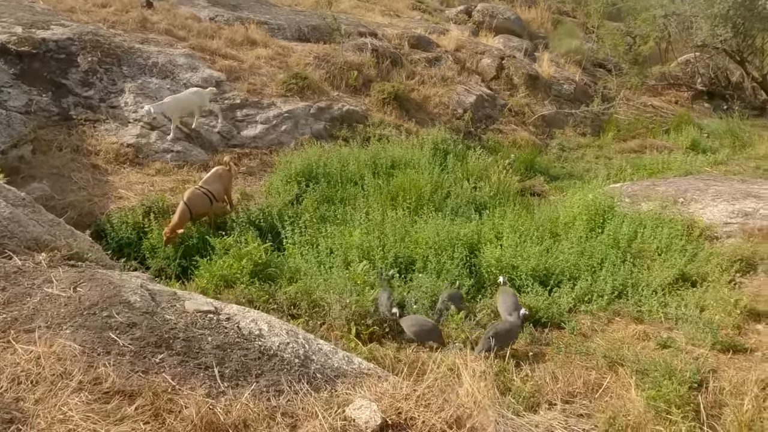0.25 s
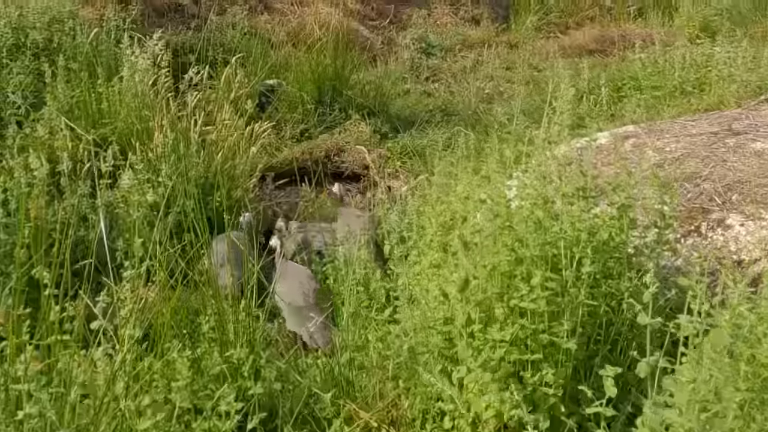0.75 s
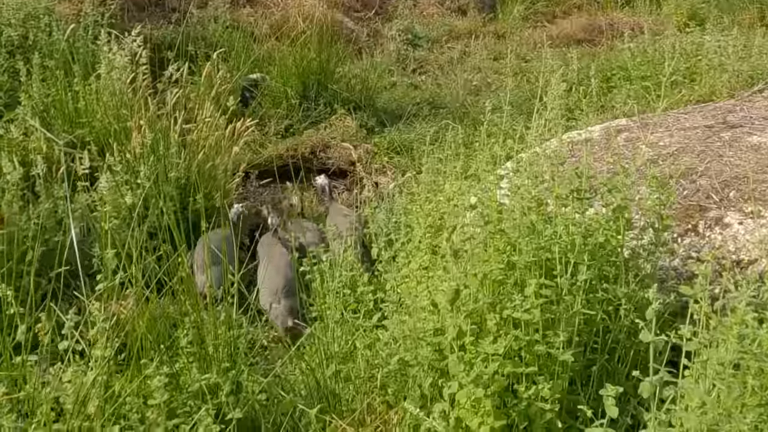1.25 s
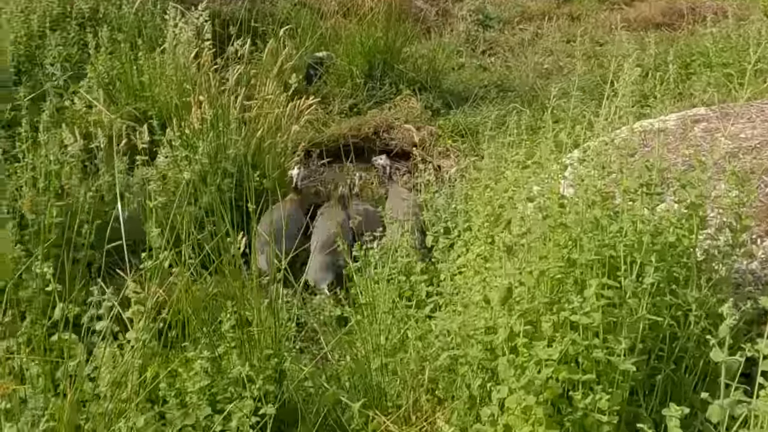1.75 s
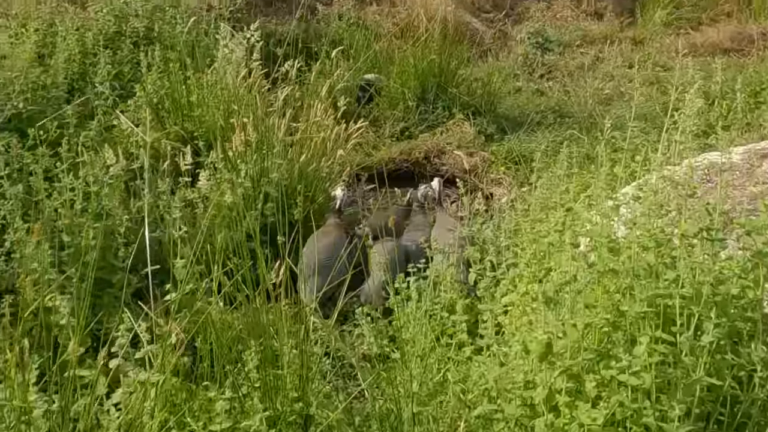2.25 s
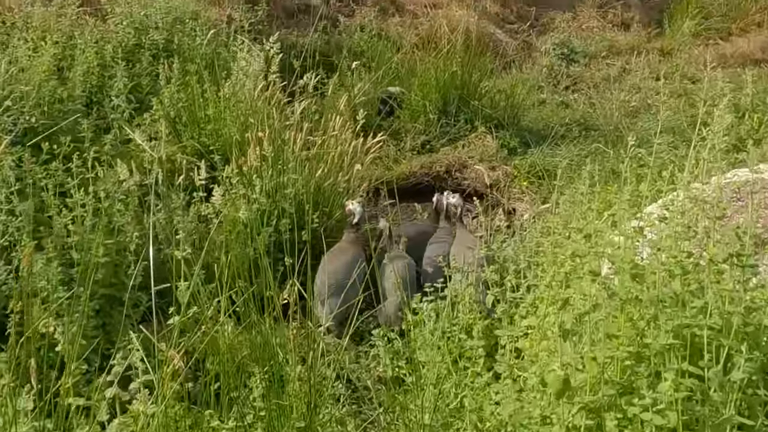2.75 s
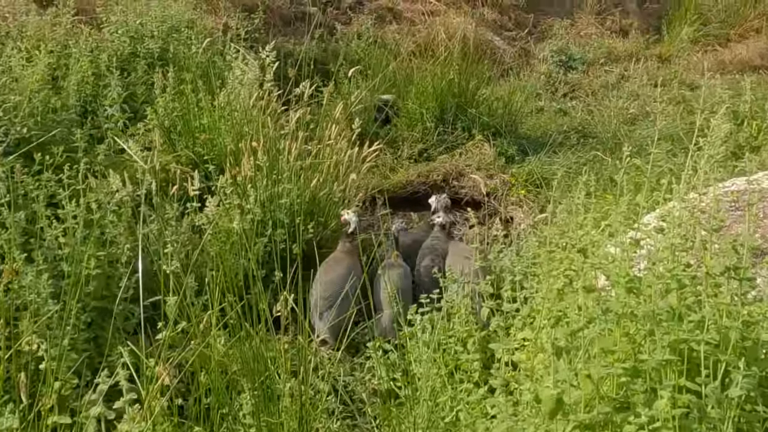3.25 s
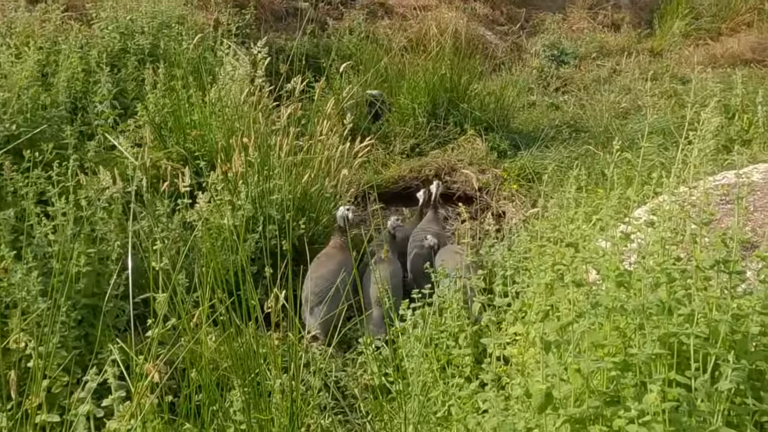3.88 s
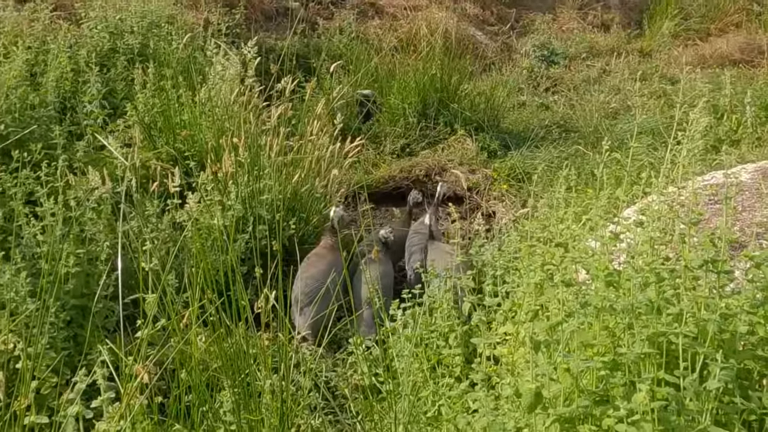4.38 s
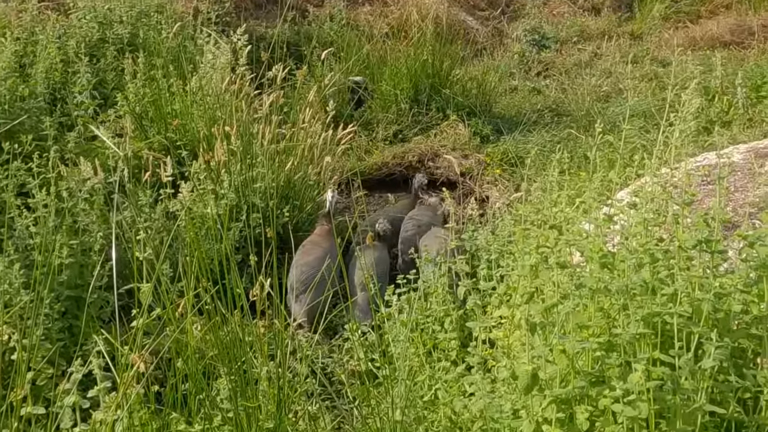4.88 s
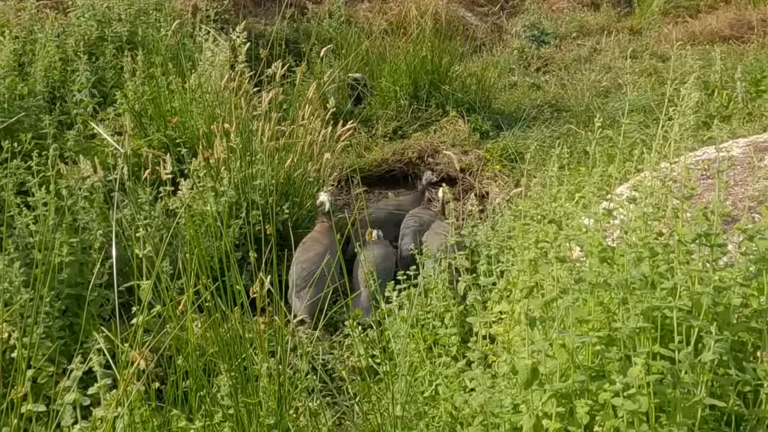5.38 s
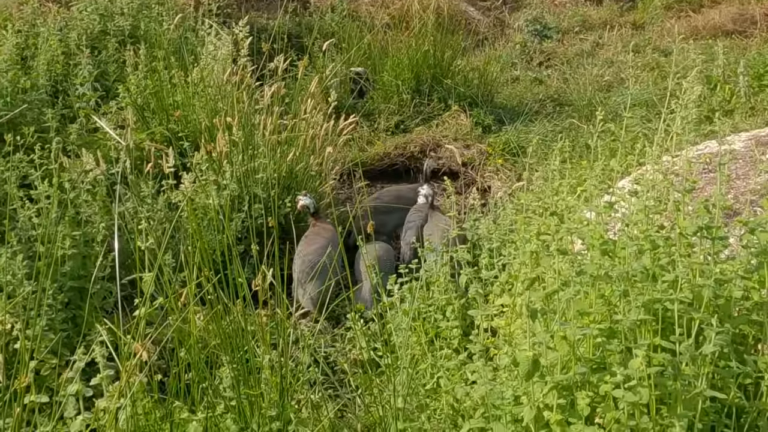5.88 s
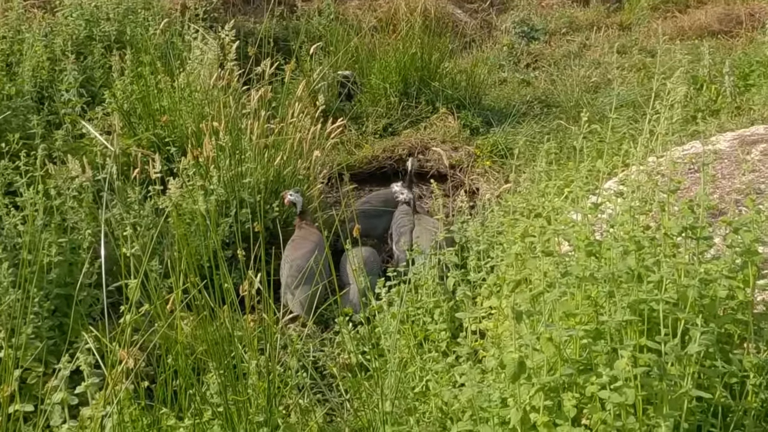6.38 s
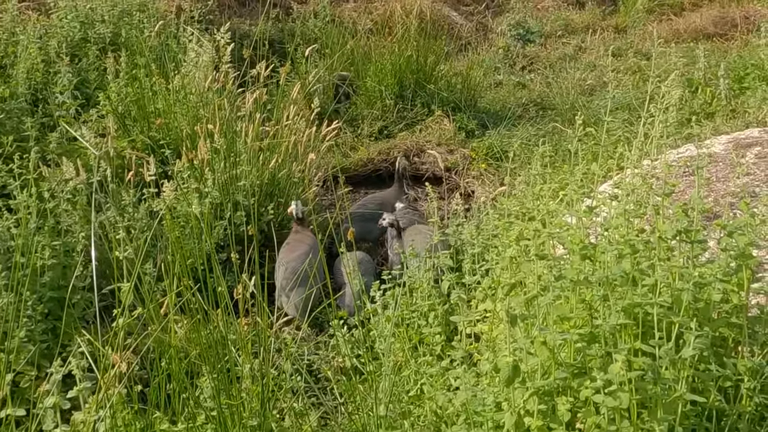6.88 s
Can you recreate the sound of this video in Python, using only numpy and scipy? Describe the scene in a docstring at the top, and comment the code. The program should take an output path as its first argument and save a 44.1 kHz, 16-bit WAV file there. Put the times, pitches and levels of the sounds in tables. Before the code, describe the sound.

Small guinea fowl calls, sparse and separate, over a soft open-air hush. The opening is busiest, with hissing grass and bright cracking stems; by two seconds the rustle has faded. Wavering whistles lead to a tall whistle and a loud harsh squawk near three and a half seconds, then more brief chirps to the end. Occasional dull thumps and tiny snaps, with a slight echo from rocks, heard by a thin-sounding outdoor microphone.

```python
"""A rocky hillside with tall weeds: a few guinea fowl call while dry grass rustles, loudest at the start.
The birds give thin arching whistles, almost sines, and low reedy cries, which are stacks of overtones, with
a few short whistle-high tones. Rasps, uneven pulses ringing the throat, often break in between them.
Stems crackle in short bursts of noise, a few soft low thumps sound, and the rocks give a faint echo.
Under it lies the hush of the open air, made of filtered noise."""
import sys
import numpy as np
from scipy import signal
from scipy.fft import rfft, irfft, next_fast_len
from scipy.io import wavfile
from scipy.ndimage import uniform_filter1d

SR = 44100
rng = np.random.default_rng(int(sys.argv[2]) if len(sys.argv) > 2 else 0)


def master_out(mix):
    """Clip the mix to full scale and print it as 16-bit PCM to the path in sys.argv[1]."""
    frames = np.transpose(np.atleast_2d(mix))
    ceiling = np.clip(frames, -1, 1)
    pcm = np.round(ceiling * 32767).astype(np.int16)
    wavfile.write(sys.argv[1], SR, pcm)


N = 314433  # length in samples


def amp(db):
    """Turns decibels into a plain factor."""
    return 10 ** (np.asarray(db) / 20)


def unit(x):
    """Scales a sound to an average (rms) strength of one."""
    return x / np.sqrt(np.mean(abs(x) ** 2) + 1e-20)


def read(points, hz):
    """Reads the gain of a spectrum at some frequencies, with straight lines over log frequency."""
    f, db = np.transpose(points)
    return amp(np.interp(np.log(hz + 1), np.log(f), db))


def colour(x, points):
    """Filters a sound by a spectrum."""
    size = next_fast_len(len(x) + 2048)
    gain = read(points, np.fft.rfftfreq(size, 1 / SR))
    return irfft(rfft(x, size) * gain, size)[:len(x)]


def band_rms(x, lo, hi):
    """Strength of one frequency band of a sound."""
    hz = np.fft.rfftfreq(len(x), 1 / SR)
    inside = (hz > lo) & (hz < hi)
    return np.sqrt(2 * np.sum(abs(rfft(x)[inside]) ** 2)) / len(x)


def wander(size, rate):
    """A random line that heads for a new value rate times a second."""
    at = np.arange(size) * rate / SR
    return unit(np.interp(at, np.arange(size), rng.standard_normal(size)))


def resonate(x, hz, width):
    """Rings one resonance, with a gain of one at its centre."""
    return signal.lfilter(*signal.iirpeak(hz, hz / width, SR), x)


def add(mix, s, sound):
    """Lays a sound into the mix at a time in seconds, cutting whatever falls outside."""
    start = round(s * SR)
    sound = sound[max(-start, 0):]
    part = mix[max(start, 0):][:len(sound)]
    part += sound[:len(part)]


def faded(x, fade=0.0017):
    """Softens both ends of a call; fade is in seconds."""
    return x * signal.windows.tukey(len(x), min(2 * fade * SR / len(x), 1))


# colour of the open air's hush: f/Hz, level/dB
AIR_COLOUR = [(140, 2.5), (400, -8.5), (800, 0.5), (1500, 9), (2300, 8.5), (2900, 1.5), (3600, -37.5),
              (6000, -16.5), (12000, -36.5)]
# low gusts, one band each: f/Hz, level/dB against each other
GUST_BANDS = [(160, 2), (300, -1.5), (520, -4)]


def air(level_db=-57.5, low_db=-69, gust_db=3.5):
    """The hush of the open hillside, with small low gusts that come and go in separate bands."""
    hush = amp(level_db) * unit(colour(rng.standard_normal(N), AIR_COLOUR))
    gusts = np.zeros(N)
    for hz, db in GUST_BANDS:
        band = unit(resonate(rng.standard_normal(N), hz, hz / 2))
        gusts += band * amp(db + gust_db * wander(N, 5))
    return hush + amp(low_db) * unit(gusts)


# steady rustle of the grass: t/s, dry hiss level/dB, dull brushing level/dB
STEADY_RUSTLE = [(0, -48, -56.5), (.35, -53, -59), (1.0, -54.5, -53), (1.65, -51, -53), (1.95, -60, -62.5),
                 (2.7, -65.5, -59.5), (4.2, -70, -61.5), (5.1, -73, -64), (5.7, -70, -60),
                 (7.12, -71.5, -63)]
# single sweeps through the grass: t/s, rise/s, fall/s, dry hiss level/dB, dull brushing level/dB
GRASS_SWEEPS = [(.005, .01, 0.038, -45.5, -48), (.56, 0.1, 0.062, -42, -48.5),
                (.705, 0.034, 0.058, -54, -47), (0.909, 0.027, 0.055, -73, -38.5),
                (1.15, 0.048, 0.021, -58, -47.5), (2.25, 0.075, 0.1, -58, -65.5),
                (3.3, .06, .07, -55.5, -51.5), (5.45, 0.21, 0.21, -72, -57.5), (6.17, 0.41, .1, -68, -58.5)]


def stirring(t):
    """Gains of the hiss and the brushing: each sweep swells and fades over the steady rustle."""
    s, *levels = np.transpose(STEADY_RUSTLE)
    power = np.array([amp(np.interp(t, s, db)) ** 2 for db in levels])
    for s, rise, fall, hiss_db, brush_db in GRASS_SWEEPS:
        # a bell curve, with its own width on either side
        swell = np.exp(-np.minimum(((t - s) / np.where(t < s, rise, fall)) ** 2, 20))
        power += (amp([[hiss_db], [brush_db]]) * swell) ** 2
    return np.sqrt(power)


# colour of the dry hiss: f/Hz, level/dB
HISS_COLOUR = [(500, -19.5), (1200, -2), (2400, 13.5), (3500, 8.5), (5000, 4.5), (7000, -2.5), (10000, -28),
               (12500, -10.5), (14000, -35.5), (16000, -29.5)]
# colour of the wash of brushed leaves: f/Hz, level/dB
BRUSH_COLOUR = [(110, -17.5), (220, -1), (380, 4), (650, 3.5), (1000, -3), (2000, -1), (4000, -25),
                (9000, -49.5)]


def grass(crackle_db=-8, crackles_per_s=600, spread_db=4, flicker_db=1.9, treble_db=-14, crisp_until_s=.62,
          crisp_crackle_db=6, clump_db=3, drop_db=-7, fade_db_per_s=4):
    """Blades slide past each other: a hiss with tiny crackles in it, over a dull brushing."""
    t = np.arange(N) / SR
    hiss_gain, brush_gain = stirring(t)
    ticks = (rng.random(N) < crackles_per_s / SR) * rng.choice([-1, 1], N)
    ticks = ticks * amp(spread_db * np.minimum(rng.exponential(1, N), 4))
    ticks *= amp(clump_db * wander(N, 45))  # crackles come in clumps
    blades = rng.standard_normal(N) * amp(flicker_db * wander(N, 70))
    # until crisp_until_s the rustle is crisper, with more crackle and fine treble;
    # then it turns duller at once, and the fine treble goes on sinking
    is_crisp = t < crisp_until_s
    blades += amp(crackle_db + crisp_crackle_db * is_crisp) * unit(ticks)
    crispness = np.where(is_crisp, 1, amp(drop_db - fade_db_per_s * (t - crisp_until_s)))
    fine_treble = colour(blades, [(6000, -39), (9500, 4), (12000, -7.5), (15000, -9)])  # f/Hz, level/dB
    hiss = colour(blades, HISS_COLOUR) + amp(treble_db) * crispness * fine_treble
    brush = colour(rng.standard_normal(N) * amp(flicker_db * wander(N, 40)), BRUSH_COLOUR)
    # the rustle levels set the strength of these two bands
    hiss /= band_rms(hiss, 4500, 8000)
    brush /= band_rms(brush, 200, 650)
    return hiss * hiss_gain + brush * brush_gain


# soft low thumps: t/s, level at the peak of the swell/dB, f/Hz
THUMP_EVENTS = [(2.835, -44.5, 174), (2.962, -48.5, 160), (3.226, -45.5, 188), (3.787, -39, 167),
                (3.92, -53.5, 169), (4.436, -43, 173), (6.125, -40.5, 183)]


def thumps(rise_s=0.0026):
    """A few dull cycles of a low sine that swell and die."""
    mix, t = np.zeros(N), np.arange(3000) / SR
    for s, db, hz in THUMP_EVENTS:
        swell = t / rise_s * np.exp(1 - t / rise_s)
        add(mix, s, amp(db) * swell * np.sin(2 * np.pi * hz * t))
    return mix


# snapping and brushed stems: t/s, level/dB, centre f/Hz, decay/s
STEM_SNAPS = [(0.0398, -22, 3970, 0.00096), (.047, -32, 3460, 0.011), (.109, -29, 3760, .001),
              (.119, -22, 3060, 0.00067), (0.154, -31, 3960, 0.0028), (0.2037, -19.5, 3300, 0.0016),
              (0.212, -29, 3500, 0.0014), (0.2316, -8, 3900, 0.00032), (.241, -7, 3900, .00025),
              (.345, -28.5, 2760, 0.0007), (.53, -26, 3320, 0.0085), (0.561, -32, 3500, 0.00049),
              (.579, -16.5, 3720, 0.0018), (.671, -25.5, 4270, 0.00087), (.855, -38.5, 6450, 0.00053),
              (1.127, -30, 2330, 0.0034), (1.246, -33, 5000, 0.0023), (2.005, -43, 6000, 0.00116),
              (2.624, -38, 2640, 0.0069), (2.634, -36, 2700, 0.0054), (2.666, -45, 2940, 0.0069),
              (2.727, -32, 2680, 0.0043), (2.763, -28.5, 1854, 0.0011), (2.771, -32.5, 2070, 0.0035),
              (2.992, -30, 2060, 0.0026), (3.203, -27.5, 1800, 0.0038), (3.46, -37.5, 2010, .002),
              (5.006, -34.5, 2600, .0007), (6.0175, -33, 2360, 0.0026), (6.063, -32, 2700, 0.0012),
              (6.165, -34, 2980, 0.0034), (6.28, -43.5, 4300, 0.0014)]


def stems(width=0.52, top_ratio=1.49, after_db=-20, after_decay_s=0.076, patter=0.24):
    """Each stem gives a short burst of fracture noise around its own pitch, then its leaves shiver."""
    mix, t = np.zeros(N), np.arange(4000) / SR
    for s, db, hz, decay in STEM_SNAPS:
        # a slowly crushed stem stirs more leaves than a clean snap
        stirred = amp(after_db) * min(decay / 0.0023, 1) ** 2
        shiver = stirred * np.exp(-t / after_decay_s + patter * wander(len(t), 400))
        fall = np.exp(-t / decay) + shiver
        burst = resonate(rng.standard_normal(len(t)) * fall, hz, width * hz)
        band = signal.butter(2, [hz / 4, top_ratio * hz], "bandpass", fs=SR)
        burst = signal.lfilter(*band, burst)
        add(mix, s, amp(db) * unit(burst) * np.sqrt(np.mean(fall ** 2)))
    return mix


# colour of a rasp's grain, shaping it after the throat resonances: f/Hz, level/dB
RASP_GRAIN = [(300, -18), (800, -5), (1500, 5.5), (2800, 5.5), (3700, -8), (5200, -7.5), (7000, -31.5),
              (14000, -47)]


def rasp(s, db, rise, fall, hz, chest_db, pulse_hz=470, unevenness=.22, width_hz=550, chest_hz=1400,
         chest_width_hz=400, breath=0.18, beak_hz=4750, beak_db=-7):
    """Uneven slaps of the membranes, with a little turbulence, ring three resonances of the throat."""
    t = np.arange(-2600, 1800) / SR
    turns = np.cumsum(pulse_hz * np.exp(unevenness * wander(len(t), 500))) / SR
    slaps = np.diff(np.floor(turns), prepend=0)  # one click per turn
    drive = unit(slaps) + breath * rng.standard_normal(len(t))
    # a wide open beak lets out the lowest and the highest resonance together
    opened = unit(resonate(drive, chest_hz, chest_width_hz))
    opened += amp(beak_db) * unit(resonate(drive, beak_hz, width_hz))
    voice = unit(resonate(drive, hz, width_hz)) + amp(chest_db) * opened
    swell = np.exp(np.where(t < 0, t / rise, -t / fall))
    voice = colour(voice, RASP_GRAIN) * swell
    return s + t[0], faded(amp(db) * unit(voice) * np.sqrt(np.mean(swell ** 2)))


# harsh, rasping stretches of the voice, pulsing unevenly near 470 Hz: peak t/s, level/dB, rise/s, fall/s,
#   main resonance f/Hz, level of the chest and beak resonances/dB
RASP_CALLS = [(.015, -22.5, 0.0084, 0.0015, 2510, -10), (0.654, -29, 0.0092, 0.0068, 2660, -25.5),
              (0.749, -27.5, 0.013, 0.0039, 2850, -28), (1.03, -27, 0.011, 0.0053, 2380, -29),
              (1.206, -23, 0.0069, 0.0037, 2600, -24), (1.5, -21, 0.012, 0.0041, 2500, -11.5),
              (1.759, -26, 0.0037, 0.0042, 2440, -21), (2.103, -30, 0.0057, 0.0083, 2520, -14.5),
              (2.507, -29.5, 0.008, 0.0079, 2570, -21), (3.487, -18.5, 0.0039, 0.01, 2400, 23),
              (3.502, -22, 0.0023, 0.0041, 2350, 5.5), (3.937, -40, 0.0095, .01, 2420, -27),
              (3.958, -22, 0.0044, 0.0065, 2250, -2.5), (5.369, -28, 0.0085, 0.0037, 2530, -4.5),
              (5.543, -33.5, 0.0067, 0.0073, 2460, -31), (5.556, -24.5, 0.0013, 0.0031, 2190, -8),
              (6.855, -38.5, 0.012, 0.0089, 2450, -20), (6.87, -23, 0.0036, 0.0078, 2220, -8)]


def rasps():
    """All the rasps, each swelling and dying within hundredths of a second."""
    mix = np.zeros(N)
    for row in RASP_CALLS:
        add(mix, *rasp(*row))
    return mix


# the throat, as the overtones of a cry meet it: f/Hz, level/dB
THROAT_COLOUR = [(1700, -12), (2300, 7), (2700, -11.5), (3500, -13), (4500, -20.5), (5800, -27),
                 (8000, -32.5)]


def cry(s, attack, hold, release, pitch_hz, glide, db, overtones_db, rough, jitter=0.066, shake_rate=800,
        soft_slope_db=9, top_slope_db=10, end_db=-25, curve=1.3, dulling=0.18):
    """A gliding stack of overtones that brightens with effort and shakes when it is rough."""
    t = np.arange(-attack, hold + release, 1 / SR)
    # the level sinks toward end_db at both ends; overtones lose a further dulling dB per dB
    away = np.maximum(np.maximum(-t / attack, (t - hold) / release), 0)
    effort_db = end_db * away ** curve
    hz = pitch_hz * 2 ** (glide * t)
    phase = 2 * np.pi * np.cumsum(hz * (1 + jitter * rough * wander(len(t), shake_rate))) / SR
    # only a pressed voice carries its high overtones
    slope_db = -soft_slope_db * np.clip((-5.0 - overtones_db) / 10, 0, 1)
    tone = np.cos(phase)
    for k in range(2, 9):
        partial_db = overtones_db + dulling * effort_db + slope_db * (k - 2) - top_slope_db * max(k - 4, 0)
        tone += amp(partial_db) * read(THROAT_COLOUR, k * hz) * np.cos(k * phase)
    shake = (1 + rough * wander(len(t), shake_rate)) / np.sqrt(1 + rough ** 2)
    return s + t[0], faded(np.sqrt(2) * amp(db + effort_db) * tone * shake)


# low reedy cries, and a few short whistle-high tones near 2000-2400 Hz: full voice at t/s, attack/s, hold/s,
#   release/s, f at full voice/Hz, glide/(octaves per s), fundamental level/dB,
#   overtone level above it before the throat/dB, roughness/0-1
CRY_CALLS = [ (0.016, .008, 0.00071, 0.004, 973, -6, -29.5, 12.5, 0.1),
             (.664, .008, .001, 0.0095, 1307, -11, -27, 1, .25),
             (1.036, 0.011, .001, 0.011, 1250, -14.5, -34, -0.5, 0.2),
             (1.208, .011, .001, 0.0074, 1332, -12.5, -21, 3.5, 0.19),
             (1.489, .032, .005, .016, 2380, -1.5, -30, -13, 0.14),
             (1.499, .023, .001, 0.016, 830, -4.5, -30.5, 3, 0.4),
             (1.513, 0.0094, .001, 0.0097, 2020, -6, -21.5, -16, 0.3),
             (1.518, .006, 0.02, 0.012, 907, -3.5, -26, 14.5, 0.11),
             (1.76, 0.0054, .001, 0.0063, 1384, -8, -29, -9.5, 0.02),
             (2.105, 0.015, .001, 0.02, 1620, 5.5, -36.5, -14.5, 0.16),
             (2.512, 0.0097, .001, .009, 1390, -7.5, -28.5, -5, 0.08),
             (2.903, .04, .015, 0.048, 1183, -1.1, -40, -15, 0.13),
             (3.068, 0.084, 0.013, 0.078, 1193, 0.3, -34.5, -19, 0.05),
             (3.19, .07, 0.026, 0.013, 1209, 1.3, -32.5, -18, .09),
             (3.486, .012, 0.0013, 0.0072, 2310, -1, -14.5, -12, 0.1),
             (3.488, 0.00614, .007, 0.013, 1460, -7, -19, -28, 0.32),
             (3.492, .012, 0.011, 0.073, 970, .1, -38.5, -4, 0),
             (3.493, 0.0068, .001, 0.026, 1952, -1, -17, -10.5, 0.28),
             (3.962, .017, 0.0046, 0.014, 1148, -7.5, -24, 1.5, 0.29),
             (4.516, .018, 0.014, 0.026, 1182, -2, -32.5, -10.5, 0.11),
             (4.728, .055, 0.004, 0.067, 1151, 0.5, -37, -13, 0.18),
             (4.853, 0.056, .001, 0.017, 1232, 3, -44, -11, .13),
             (5.37, .01, .001, 0.0086, 1366, -5, -30, -14, 0.24),
             (5.557, .018, .001, 0.011, 1182, -3, -37.5, -1, 0.3),
             (6.871, .014, 0.0036, 0.01, 1178, -8, -20.5, -0.5, 0.09),
             (6.959, .006, .001, 0.0086, 1304, -10, -34, -10, 0.12),
             (7.127, .022, .001, .01, 1328, -0.5, -44.5, -7, 0.1), ]


def cries():
    """The low reedy cries and a few short whistle-high tones, each gliding through its own pitch."""
    mix = np.zeros(N)
    for row in CRY_CALLS:
        add(mix, *cry(*row))
    return mix


def whistle(t, hz, db, overtones_db=0, flutter_hz=0, flutter_depth=0, jitter=0.0097, fast_glide=22000,
            source_db=-35, least_strain=.25, flutter_sag=0.17):
    """The high voice: almost a sine; quick glides strain it into an octave and period doubling."""
    glide_speed = abs(np.gradient(hz)) * SR  # Hz per s
    strain = np.clip(uniform_filter1d(glide_speed / fast_glide, size=1200), least_strain, 1)
    # in a trill, pitch and loudness dip together once in each beat; 3/8 is the mean of the dips
    dip = np.sin(np.pi * flutter_hz * (t - t[0])) ** 4 - 3 / 8 if flutter_hz else 0
    unsteady = 1 + jitter * wander(len(t), 350) - flutter_sag * flutter_depth * dip
    phase = 2 * np.pi * np.cumsum(uniform_filter1d(hz, size=150) * unsteady) / SR
    # gentle whistles stay purer; period doubling grows fastest with loudness
    effort_db = np.clip(db.max() + 20, -9, 0)
    edge = amp(-24 + .6 * effort_db) * np.sin(2 * phase)
    edge += amp(-21 + 1.8 * effort_db) * (np.sin(phase / 2) + np.sin(3 * phase / 2))
    # the loudest moments come from a throat resonance, which lifts the fundamental alone
    edge *= amp(overtones_db + np.minimum(source_db - db, 0) / 2) * strain
    edge *= .8 + .6 * wander(len(t), 200)
    shimmer = 1 + .17 * np.sqrt(strain) * wander(len(t), 250)
    loudness = amp(db) * shimmer * (1 - flutter_depth * dip)
    return t[0], faded(np.sqrt(2) * loudness * (np.sin(phase) + edge))


# two long wavering notes that lead into the tall arches: t/s, f/Hz, level/dB
WAIL_ONE = [(2.85, 1905, -43), (2.872, 2244, -39), (2.93, 2004, -40), (2.99, 2047, -37), (3.028, 2204, -38),
            (3.088, 2210, -39.5), (3.126, 2064, -37.5), (3.208, 2180, -38.5), (3.22, 2187, -54)]
WAIL_TWO = [(4.478, 1810, -57), (4.494, 2044, -37), (4.536, 2280, -46), (4.56, 1770, -51.5),
            (4.63, 1946, -44.5), (4.718, 2024, -45), (4.792, 1940, -47), (4.842, 2170, -34.5),
            (4.85, 2259, -42)]


def wails():
    """Long whistles whose pitch and level move in straight lines from point to point."""
    mix = np.zeros(N)
    for rows in (WAIL_ONE, WAIL_TWO):
        s, pitch_hz, level_db = np.transpose(rows)
        t = np.arange(s[0], s[-1], 1 / SR)
        hz, db = np.interp(t, s, pitch_hz), np.interp(t, s, level_db)
        add(mix, *whistle(t, hz, db, overtones_db=-11))
    return mix


def arch(s, rise, fall, foot_hz, top_hz, db, ring_hz, upper_db, lower_db, lean, overtones_db, curve=1.8,
         lower_ring_hz=2247, ring_width_hz=146, lean_db=6.5, end_db=-8.5, end_power=7.5):
    """The pitch climbs and drops; the whistle flares wherever it crosses a resonance of the throat."""
    t = np.arange(-rise, fall, 1 / SR)
    along = np.where(t < 0, t / rise, t / fall)  # -1 at the first foot, 0 at the top, 1 at the last foot
    hz = top_hz + (foot_hz - top_hz) * abs(along) ** curve  # a curve of 2 would be a parabola
    lift_db = upper_db / (1 + ((hz - ring_hz) / ring_width_hz) ** 2)
    lift_db += lower_db / (1 + ((hz - lower_ring_hz) / ring_width_hz) ** 2)
    # the voice grows toward the side on which the effort leans, and thins out at both feet
    pressed = np.clip(1 + lean * np.tanh(10 * along), 0, 1)
    swell_db = lean_db * lean * along + end_db * abs(along) ** end_power
    return s + t, hz, db + pressed * lift_db + swell_db, overtones_db


def twin(s, t, hz, gap_hz=350, closes_hz_per_s=19000, db=-64, lead_s=.045, lag_s=.012):
    """A second tone around the top of a tall arch, which slides down to meet the first."""
    near = (t > s - lead_s) & (t < s + lag_s)
    t, hz = t[near], hz[near]
    phase = 2 * np.pi * np.cumsum(hz + gap_hz - closes_hz_per_s * (t - s)) / SR
    return t[0], faded(np.sqrt(2) * amp(db) * np.sin(phase), fade=.012)


# a whistle that flutters: same columns as the arching whistles below
FLUTTERING_WHISTLES = [(.824, .0525, 0.053, 2043, 2639, -37.5, 2596, 18.3, 0, 0, -2)]


def trills():
    """An arching whistle whose pitch and loudness dip rapidly in step."""
    mix = np.zeros(N)
    for row in FLUTTERING_WHISTLES:
        add(mix, *whistle(*arch(*row), flutter_hz=115.5, flutter_depth=0.81))
    return mix


# arching whistles: top at t/s, rise/s, fall/s, foot f/Hz, top f/Hz, level before lift and lean/dB,
#   upper throat resonance f/Hz, its lift/dB, lift of the lower resonance/dB,
#   lean of the effort (-1 on the rise to 1 on the fall), overtone adjustment/dB
ARCHING_WHISTLES = [ (.002, .002, 0.017, 1810, 3000, -33, 2700, -1, 10.5, 1, -7),
                    (0.642, 0.016, 0.021, 2030, 3100, -28, 2660, 4.5, 0, 0.54, -7),
                    (1.004, 0.0051, 0.032, 2106, 3100, -45, 2500, 22, 3, 0.82, -14),
                    (1.187, .024, .026, 2088, 3005, -32.5, 2550, 4, 6, .6, -4.5),
                    (1.742, .028, 0.019, 1884, 3035, -36.5, 2790, 9, 19, 0.81, -4),
                    (2.12, 0.047, .021, 1852, 2890, -36.5, 2446, 7.5, 12.5, -0.6, 1.5),
                    (2.49, 0.034, 0.019, 1947, 3070, -39, 2750, 17.5, 9, 0.4, 0.5),
                    (3.278, 0.067, .073, 1850, 3790, -48.5, 2640, 20, 5.5, 0.52, -1),
                    (4.917, .078, 0.064, 1895, 3720, -48.5, 2600, 2, 5, 1, 7),
                    (5.347, 0.034, .022, 1780, 3176, -38, 2660, 20, 6, 0.71, -5),
                    (5.765, 0.03, .039, 2070, 3240, -53.5, 2600, 22.5, 11, 0.28, -2.5),
                    (5.85, 0.028, .031, 1815, 2497, -36, 2500, 0.5, 3, 0.53, 3),
                    (6.76, 0.034, 0.021, 1493, 2242, -37, 2600, 5, 5, -0.27, 3.5),
                    (6.94, 0.031, 0.017, 2090, 3220, -52.5, 2630, 20.5, 14, 0.32, 5.5),
                    (7.125, 0.027, 0.0067, 1850, 2700, -54, 2300, 17, 2, 0.21, -2), ]


def whistles(twin_above_hz=3480):
    """All the arching whistles; the tallest ones carry a second tone."""
    mix = np.zeros(N)
    for row in ARCHING_WHISTLES:
        t, hz, db, overtones_db = arch(*row)
        add(mix, *whistle(t, hz, db, overtones_db))
        if hz.max() > twin_above_hz:
            add(mix, *twin(row[0], t, hz))
    return mix


def birds():
    """All the voices of the flock."""
    return rasps() + cries() + wails() + trills() + whistles()


def hillside(x, tail_db=-25, t60_s=0.39, near_db=-31, far_db=-37):
    """Two weak reflections from the rocks and a short scatter from the plants."""
    t = np.arange(SR // 2) / SR
    echo = rng.standard_normal(len(t)) * amp(-60 * t / t60_s) * (t > .004)
    echo *= amp(tail_db) / np.linalg.norm(echo)
    echo[round(.019 * SR)] += amp(near_db)
    echo[round(.042 * SR)] += amp(far_db)
    return x + signal.fftconvolve(x, echo)[:N]


def scene():
    """Birds and stems echo on the hillside, with thumps, grass and air around them."""
    return (air() + grass() + thumps() + hillside(stems() + birds()))[None]


# the microphone's response: f/Hz, level/dB
MIC_RESPONSE = [(20, -32.5), (95, -21), (115, -33), (145, 2), (8400, -3), (8900, -5), (9100, -18),
                (9500, 1.5), (16000, -17.5)]


def record(dry, edge_hz=15700):
    """A microphone with a bass cut and a narrow treble notch; then the band limit."""
    heard = colour(dry[0], MIC_RESPONSE)
    low_pass = signal.firwin(511, edge_hz, window=("kaiser", 9), fs=SR)
    return signal.oaconvolve(heard, low_pass, "same")[None]


dry = scene()
out = record(dry)
master_out(out)
```